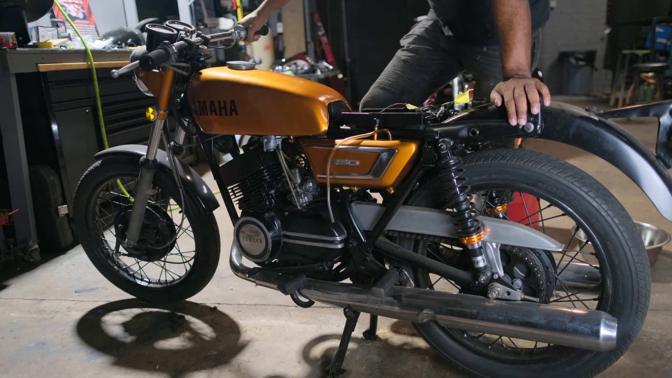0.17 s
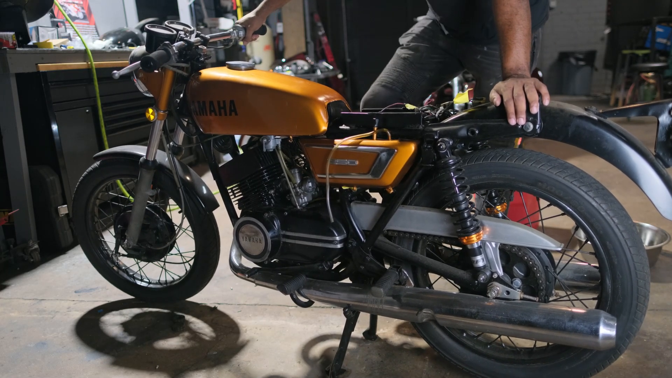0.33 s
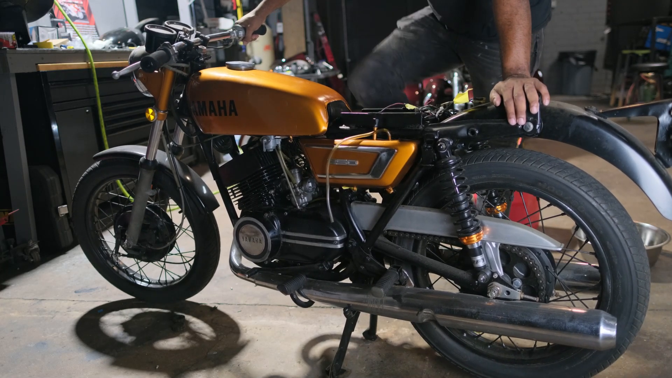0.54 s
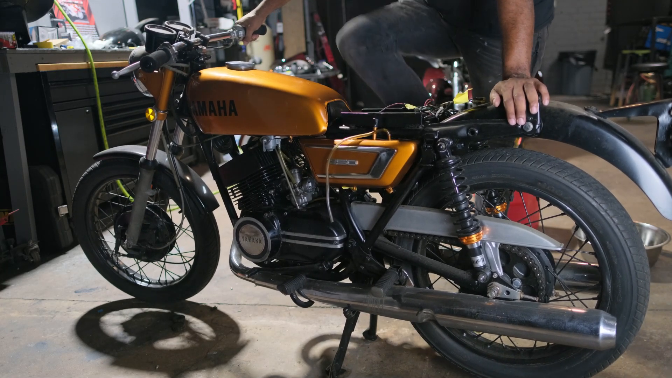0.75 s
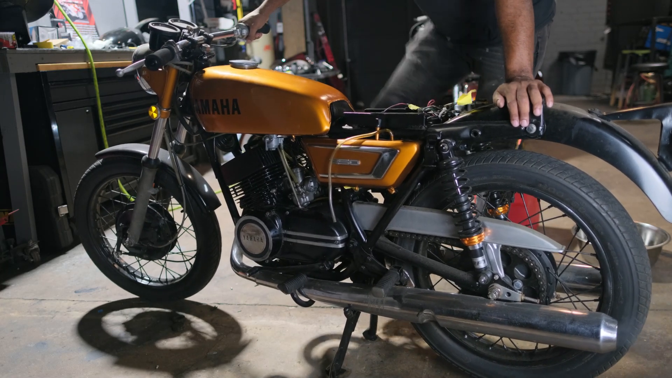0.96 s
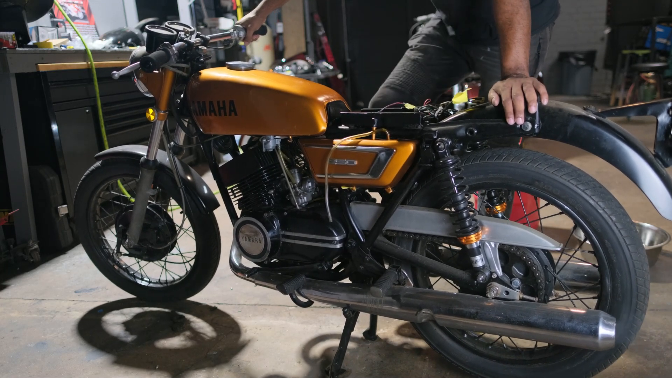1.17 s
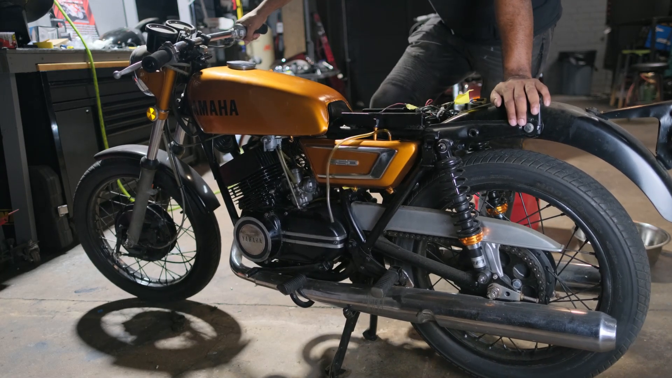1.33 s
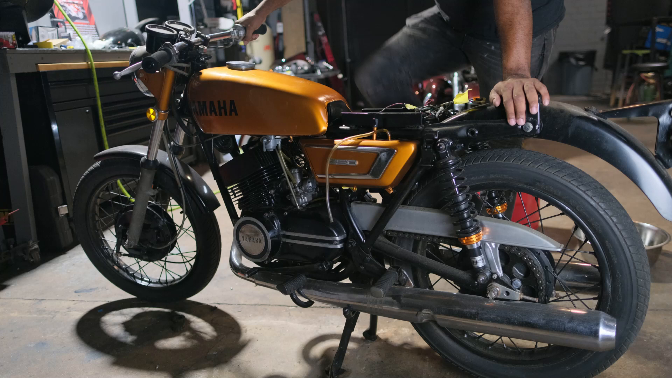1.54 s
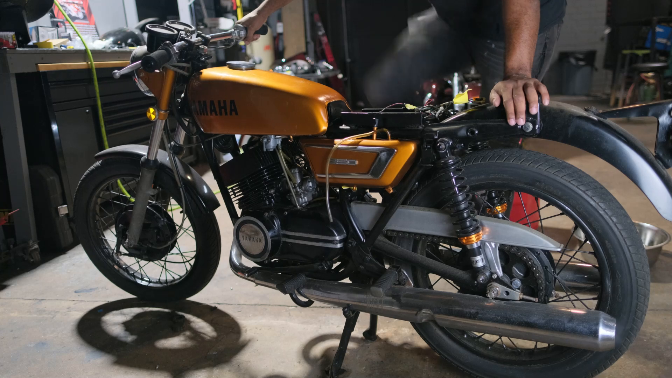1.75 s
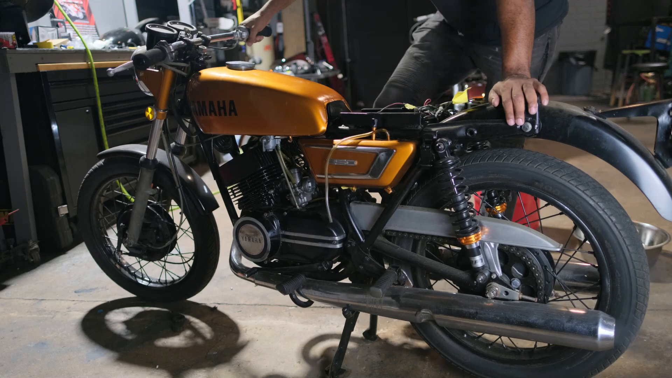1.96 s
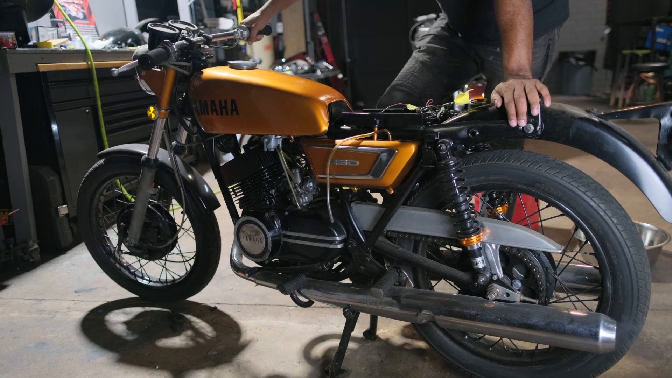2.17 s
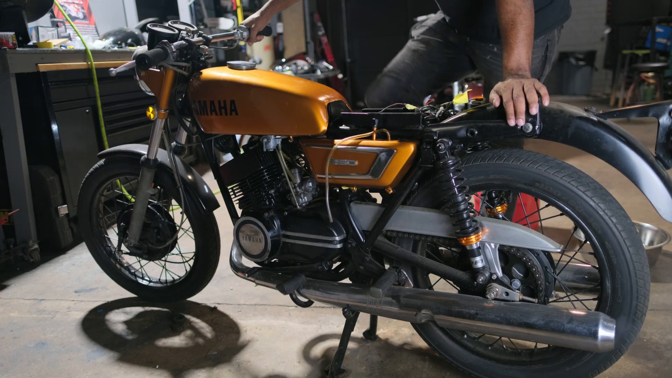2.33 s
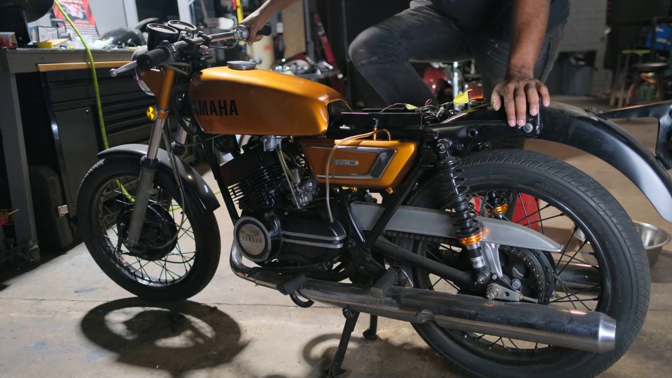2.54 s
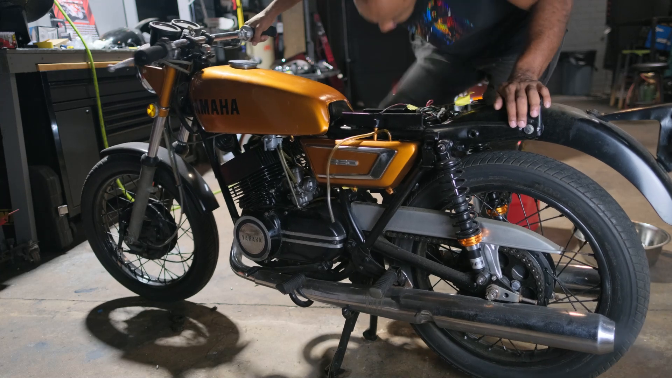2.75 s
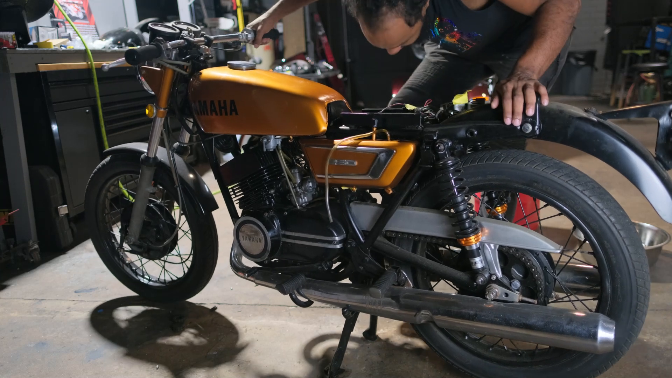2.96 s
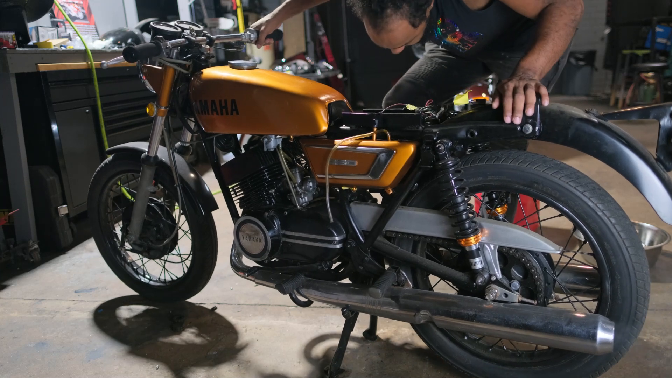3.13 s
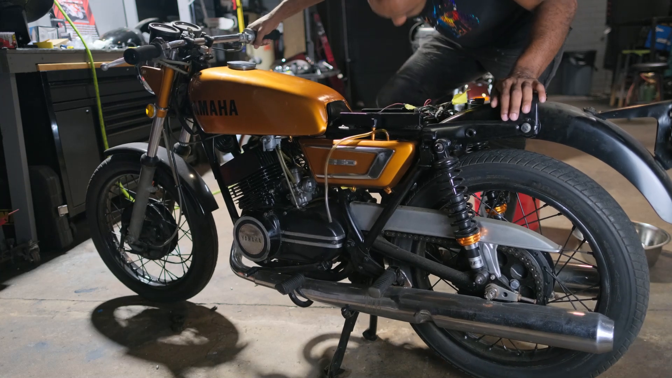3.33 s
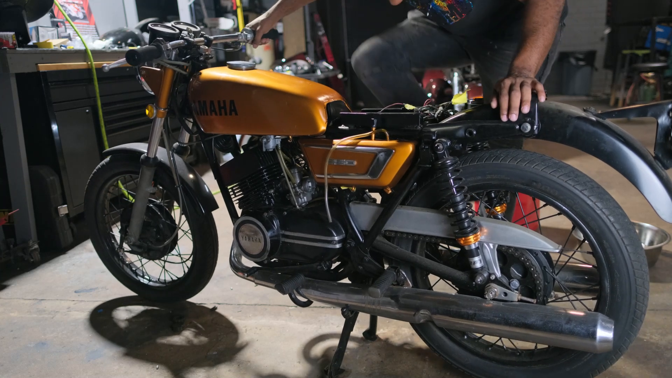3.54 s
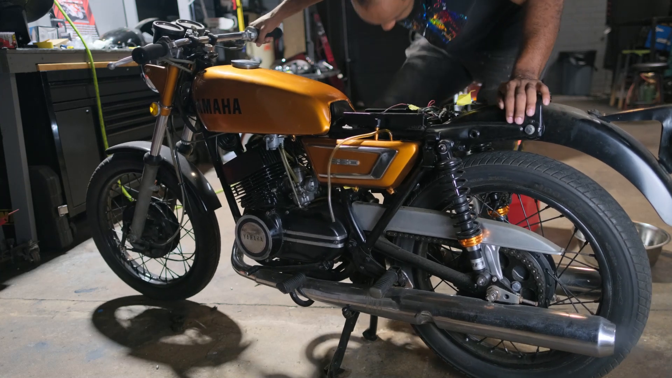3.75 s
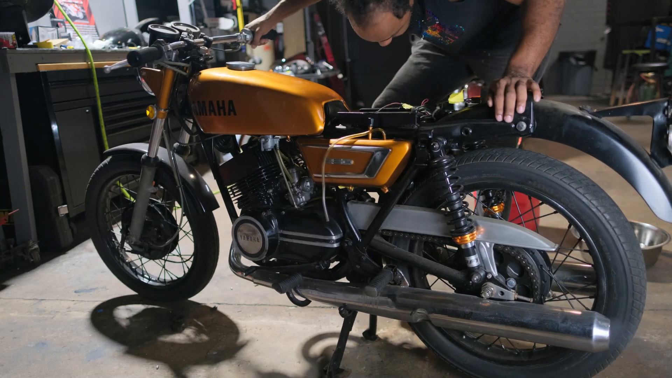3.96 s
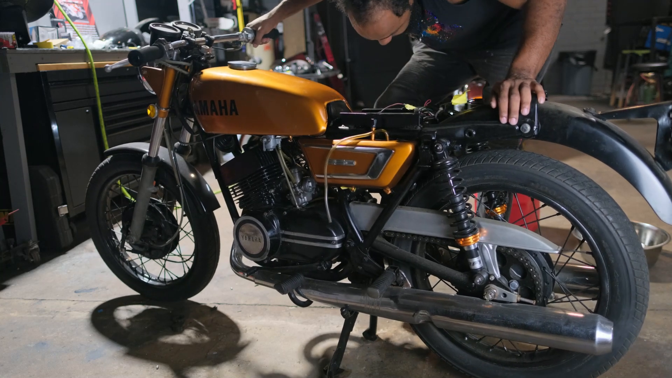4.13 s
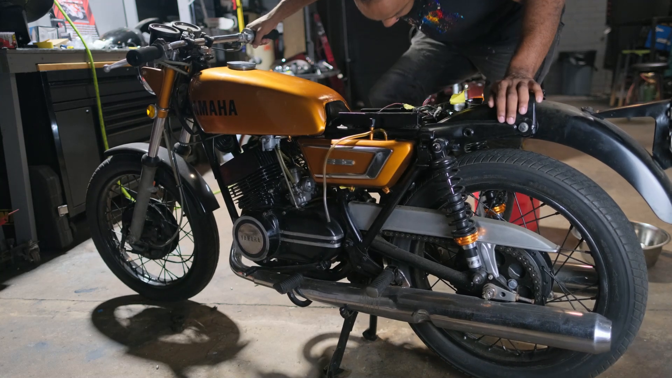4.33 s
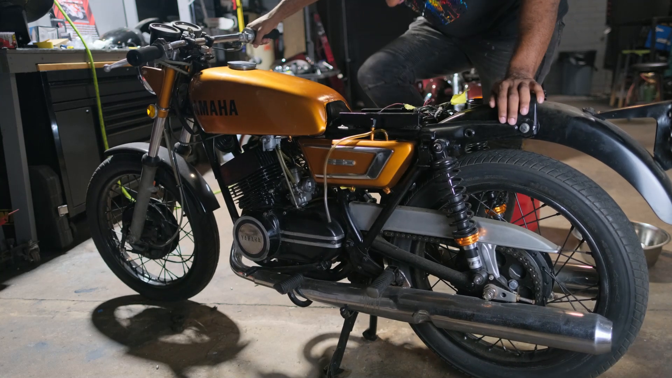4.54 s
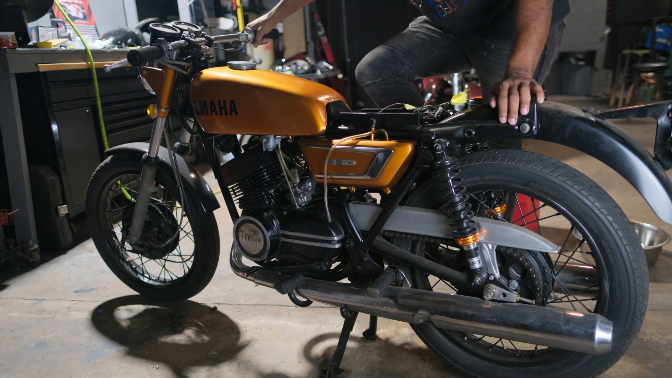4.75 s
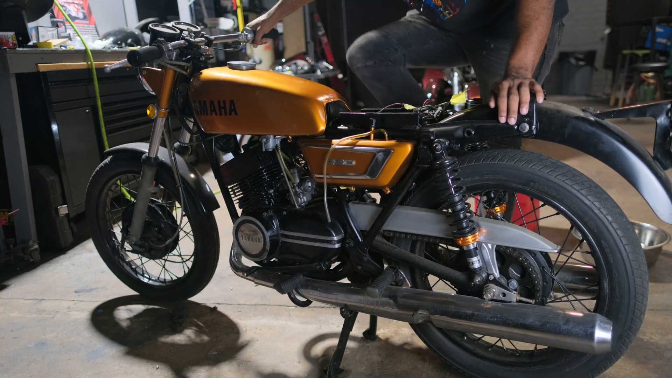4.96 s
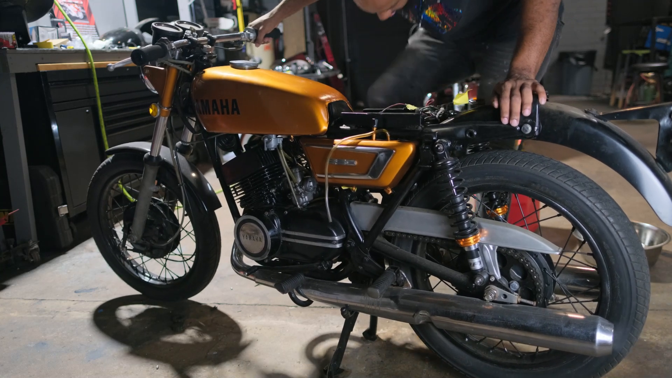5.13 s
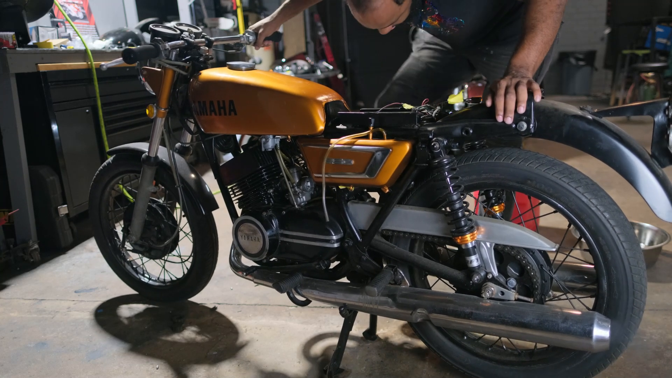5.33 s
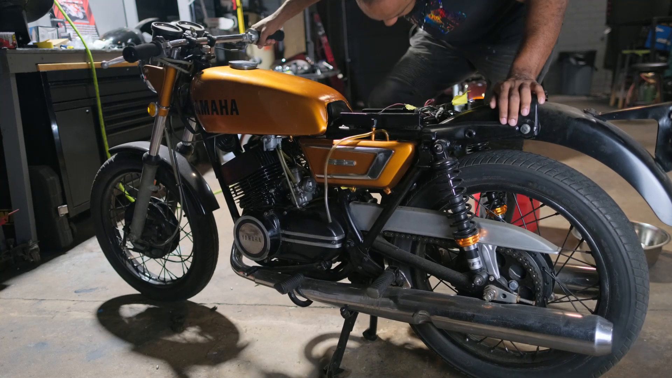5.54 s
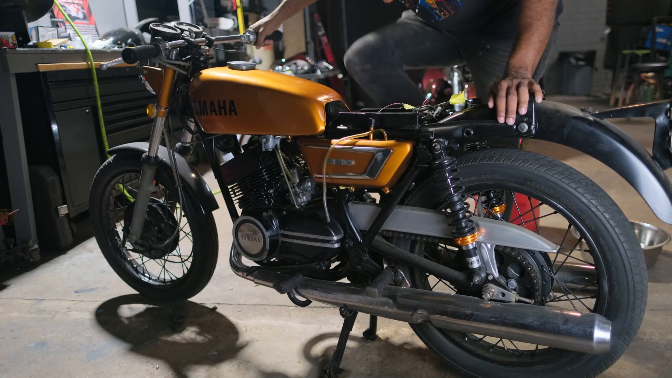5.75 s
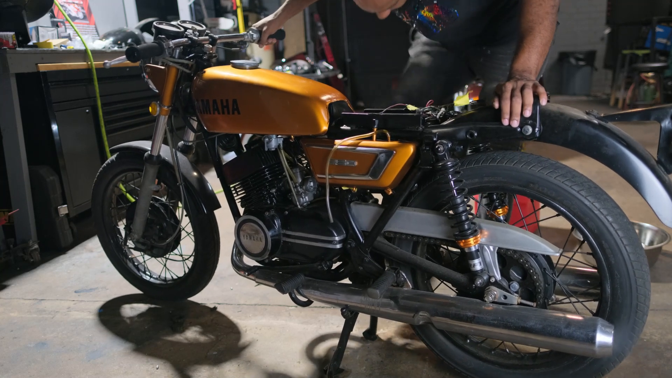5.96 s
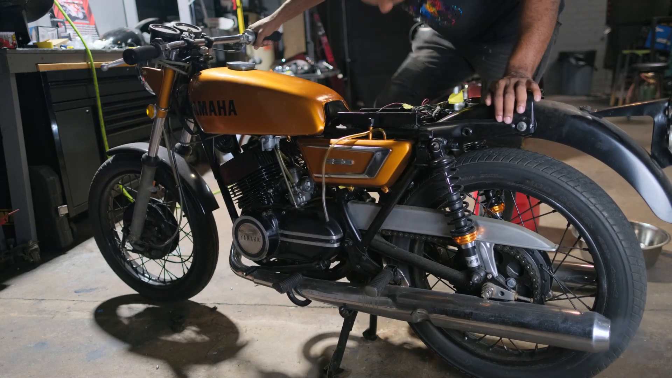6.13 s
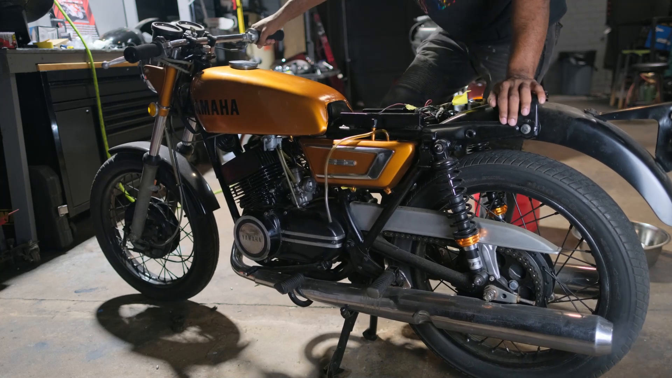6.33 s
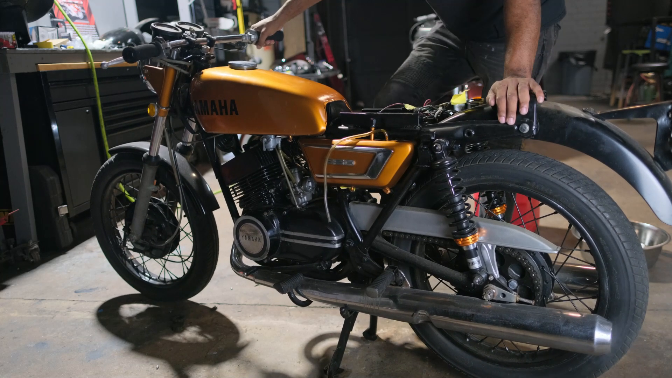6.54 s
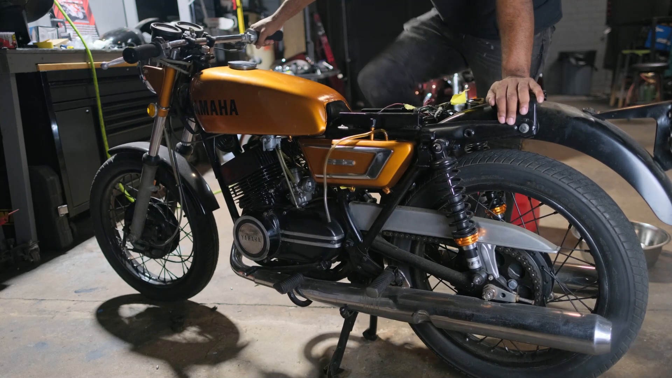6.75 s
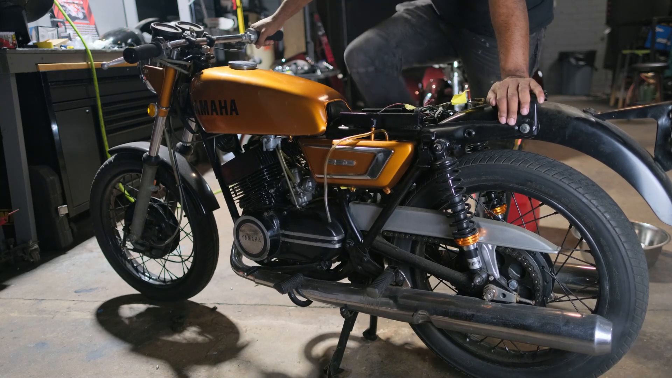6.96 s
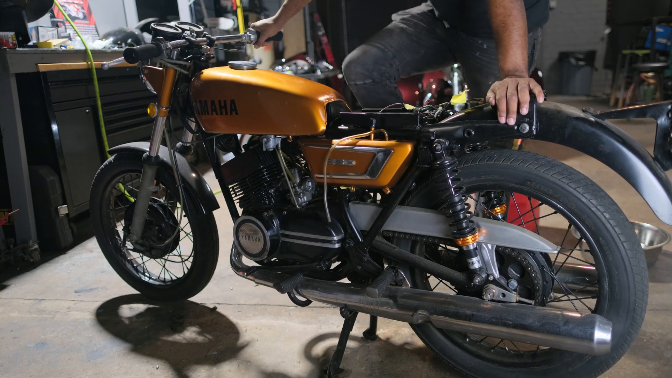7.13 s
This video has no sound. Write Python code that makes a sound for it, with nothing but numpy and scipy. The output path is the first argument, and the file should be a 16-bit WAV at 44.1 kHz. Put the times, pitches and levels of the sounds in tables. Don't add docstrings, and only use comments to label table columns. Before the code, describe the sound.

Repeated failed kick-starts: hard metallic clanks, short gear whirr with airy exhaust chuffs dying away, then a slipped lever slaps loudly and the room rings.

```python
import sys
import numpy as np
from scipy import signal
from scipy.fft import rfft, irfft
from scipy.io import wavfile
from scipy.ndimage import uniform_filter1d

SR = 44100
rng = np.random.default_rng(int(sys.argv[2]) if len(sys.argv) > 2 else 0)


def rack_gain(trim_db):
    fader = np.asarray(trim_db, float)
    return 10 ** (fader / 20)


def unload_audio(sound):
    columns = np.transpose(np.atleast_2d(sound))
    steps = np.round(np.clip(columns, -1, 1) * 32767)
    wavfile.write(sys.argv[1], SR, steps.astype(np.int16))


N = 317107

# [f/Hz, width/Hz, level/dB]
CASE_MODES = [(1574, 300, 0), (2140, 460, -0.5), (2913, 360, 1.5), (3295, 144, 1.5), (3610, 660, -3)]
# [f/Hz, width/Hz, level/dB]
PIPE_MODES = [(85.3, 18.2, 2), (102.3, 19.2, -5.5), (132.4, 21.9, -3.5), (168.8, 50, -21),
              (198.5, 20.3, -11.5), (231.5, 19, -30)]
# [f/Hz, density/dB per Hz]
PORT_HISS = [(2530, -53), (4300, -21), (5980, -1.5), (6460, -5.5), (6790, 4), (7790, 2), (8500, -4),
             (11600, -7), (12600, -15), (15100, -12), (16000, -31)]


def evened(x):
    return x / np.sqrt(np.mean(x ** 2) + 1e-20)


def peaked(x):
    return x / abs(x).max()


def read(points, hz):
    f, value = np.transpose(points)
    return np.interp(np.log(hz + 1), np.log(f + 1), value)


def add(mix, start_s, sound):
    part = mix[round(max(start_s, 0) * SR):][:len(sound)]
    part += sound[:len(part)]


def coloured(points):
    spectrum = rfft(rng.standard_normal(N))
    return evened(irfft(spectrum * rack_gain(read(points, np.fft.rfftfreq(N, 1 / SR))), N))


def body(x, modes):
    out = np.zeros(len(x))
    for k, (hz, width_hz, db) in enumerate(modes):
        r = np.exp(-np.pi * 1.62 * width_hz / SR)
        pole = r * np.exp(2j * np.pi * hz / SR)
        ring = x
        for _ in range(2):
            ring = 2 * signal.lfilter([1 - r], [1, -pole], ring).real
        out += (-1) ** k * rack_gain(db) * ring
    return out


def crank():
    # [start t/s, rise/s, driven/s, gears level/dB, pipes level/dB]
    kicks = [
        (-0.06, 0.12, 0.08, -23, -15),
        (0.815, 0.1, 0.23, -23, -16.5),
        (1.762, 0.12, 0.25, -27.5, -20),
        (2.625, 0.065, 0.31, -23, -16.5),
        (3.683, 0.085, 0.24, -26, -18),
        (5.09, 0.095, 0.22, -23, -16),
        (5.879, 0.105, 0.13, -25.5, -17),
    ]
    start_db, sag_db_per_s, coast_db_per_s = (-8, -10), (20, 24), (105, 115)
    power = np.zeros((3, N))
    for start_s, rise_s, driven_s, *tops_db in kicks:
        t = np.arange(N) / SR - start_s
        rising = np.clip(1 - t / rise_s, 0, 1)
        held_s = np.clip(t - rise_s, 0, driven_s)
        coasting_s = np.clip(t - rise_s - driven_s, 0, None)
        gears_db, pipes_db = (top + start * rising - sag * held_s - coast * coasting_s for top, start, sag, coast
                              in zip(tops_db, start_db, sag_db_per_s, coast_db_per_s))
        bright_db = np.minimum(-8 + 25 * t, 1)
        breathing_db = tops_db[1] - 11.5 - 27 * t
        kick = rack_gain(2 * np.array([gears_db, gears_db + bright_db, pipes_db]))
        kick[2] += rack_gain(2 * breathing_db)
        power += kick * np.clip(t / 0.008, 0, 1)
    return np.sqrt(power)


def ports(pipes):
    # [t/s, air level/dB]
    spits = [(0.1146, -25.5), (0.202, -22), (0.2788, -30), (1.03, -23.5), (1.073, -24), (1.153, -26),
             (1.226, -32), (1.3225, -37), (1.8254, -31), (1.8713, -33), (1.9273, -22.5), (2.0643, -23),
             (2.15, -33), (2.805, -26), (2.9, -29), (2.981, -24), (3.8434, -31), (3.9834, -20),
             (4.0676, -29), (4.1594, -38), (5.1523, -24.5), (5.3018, -26), (5.454, -18), (5.5413, -35),
             (5.641, -37), (5.909, -25.5), (5.9406, -27), (6.0186, -31), (6.127, -22), (6.289, -31)]
    # [t/s, air level/dB]
    puffs = [(0.0, -23.5), (0.04, -33), (0.0732, -24), (0.3216, -31), (0.38, -41), (0.8455, -28),
             (0.8864, -28), (0.9204, -35), (0.9547, -24.5), (0.9894, -31), (1.27, -32.5), (1.9962, -23),
             (2.109, -32), (2.241, -37), (2.294, -38), (2.6494, -24.5), (2.6807, -30), (2.7236, -26),
             (2.8596, -25), (3.104, -34), (3.7534, -27), (3.9072, -25), (5.1954, -27), (5.219, -31),
             (5.269, -25.5), (6.0777, -27), (6.1705, -30), (6.334, -32)]
    # [t/s, air level/dB]
    chuffs = [(0.1414, -33), (0.235, -31), (0.443, -44), (1.1094, -32), (1.18, -28), (1.3805, -37),
              (1.793, -36), (2.0265, -38), (2.1765, -30), (2.9357, -31), (3.04, -38), (3.708, -33),
              (3.8142, -26), (3.942, -44), (4.0194, -38), (4.102, -31), (4.21, -42), (5.117, -28),
              (5.3635, -28.5), (5.385, -29), (5.4913, -36), (5.5777, -32), (5.704, -45), (5.9903, -29),
              (6.234, -29.5), (6.3994, -47)]
    # (rows, case sound/dB re air, thump/dB re pipes, length/s)
    kinds = [(spits, -4, 1.5, 0.015), (puffs, 3.5, 3, 0.023), (chuffs, 9.5, 1.5, 0.022)]
    hiss, case, steps = np.zeros((3, N))
    t = np.arange(6000) / SR
    for rows, case_db, thump_db, length_s in kinds:
        burst = (1 - np.exp(-t / 0.0035)) * np.exp(-t / (1.15 * length_s))
        for start_s, air_db in rows:
            add(hiss, start_s, rack_gain(air_db - 10.5) * burst)
            add(case, start_s, rack_gain(air_db + case_db - 6.5) * burst)
            add(steps, start_s, rack_gain(thump_db - 4.5) * np.hanning(160))
    shove = (45, 30, -11)
    thump = rack_gain(16.5) * body(steps * pipes, PIPE_MODES + [shove])
    case_noise = evened(body(rng.standard_normal(N), CASE_MODES))
    return hiss * coloured(PORT_HISS) + case * case_noise + thump


def whirr(gears, rattle, pipes):
    # [f/Hz, width/Hz, level/dB]
    gear_modes = [(189.5, 105, 0.5), (433, 132, -1), (626, 111, 0), (770, 85, -0.5), (1100, 420, -5.5)]
    hits = rng.random(N) < 900 / SR
    hit_gain = rack_gain(3.14 * np.minimum(rng.exponential(1, N), 4))
    teeth = rng.standard_normal(N) * (0.18 + hit_gain * hits)
    drone = evened(body(rng.standard_normal(N), PIPE_MODES))
    drone = drone / (0.18 + uniform_filter1d(drone ** 2, size=1600)) ** 0.36
    low = rack_gain(-3) * gears * evened(body(teeth, gear_modes))
    high = rack_gain(-12) * rattle * evened(body(teeth, CASE_MODES))
    leak = rack_gain(-28) * gears * coloured(PORT_HISS)
    return low + high + rack_gain(-3.5) * pipes * evened(drone) + leak


def background():
    # [f/Hz, density/dB per Hz]
    air = [(15, 2), (45, 2), (108, 7), (170, -4), (236, -10), (354, -12), (463, -13), (734, -18.5),
           (936, -19), (2000, -26), (3340, -33.5), (5280, -35), (16000, -43)]
    # [t/s, level/dB]
    hum_levels = [(0.0, -58), (0.64, -60), (1.3, -58), (1.6, -56), (2.0, -60), (2.45, -63), (3.1, -56),
                  (3.5, -57), (4.0, -62), (4.48, -65), (4.8, -59), (5.19, -57), (5.75, -62), (7.19, -64.5)]
    s, db = np.transpose(hum_levels)
    waver = evened(uniform_filter1d(rng.standard_normal(N), size=9000))
    hum_hz = 237.8 + 2.6 * waver
    hum = np.sqrt(2) * np.sin(2 * np.pi * np.cumsum(hum_hz) / SR)
    return rack_gain(-50) * coloured(air) + rack_gain(np.interp(np.arange(N) / SR, s, db)) * hum


def garage(x):
    # [f/Hz, t60/s]
    decay = [(60, 1.01), (150, 1.16), (500, 1.286), (1500, 1.057), (4000, 1.07), (8000, 0.68),
             (16000, 0.55)]
    taps = np.zeros(2 * SR)
    at = np.arange(300, 2 * SR - 20, 20)
    taps[at + rng.integers(0, 20, len(at))] = rng.choice([-1., 1.], len(at))
    hz, t, z = signal.stft(taps, SR, nperseg=512)
    fade = rack_gain(-60 * t / read(decay, hz)[:, None])
    tail = signal.istft(z * fade, SR, nperseg=512)[1]
    return signal.fftconvolve(x, tail / np.linalg.norm(tail))[:N]


def chatter(length_s, grit):
    t = np.arange(4000) / SR / length_s
    shape = t * np.exp(-(t / 0.87) ** 2) + 0.14 * np.minimum(t, 1) * np.exp(-t / 1.3)
    z = rfft(rng.standard_normal(len(t)) * shape)
    flat = z / np.sqrt(uniform_filter1d(abs(z) ** 2, size=9))
    contact = irfft(flat, len(t)) * np.sqrt(shape)
    impact = np.exp(-((t - 0.5) / 0.0066) ** 2)
    return grit * 1.6 * peaked(contact) + 1.1 * impact


def blow(db, hz, case_db, tick_db, length_s):
    force = chatter(length_s, 1.0)
    ring = body(force, [(hz, 200, 0), (0.5 * hz, 250, -7), (1.25 * hz, 260, -8)])
    case = body(force, CASE_MODES)
    tick = body(force, [(4300, 600, 4), (6200, 1700, 1), (10500, 3000, -3), (14500, 2000, -7)])
    frame = body(force, [(170, 135, 2), (332, 62, -6)])
    struck = peaked(ring) + rack_gain(case_db) * peaked(case)
    return rack_gain(db) * (struck + rack_gain(tick_db) * peaked(tick) + rack_gain(-14) * peaked(frame))


def lever():
    # [t/s, level/dB, main ring f/Hz, case level/dB re blow,
    # tick level/dB re blow]
    ticks = [(0.77, -40, 684, -7, -32), (0.787, -33, 654, -1, -31), (0.792, -33, 1050, -12, -21),
             (1.694, -31.5, 620, -14, -27.5), (1.714, -39, 600, 1, -18), (1.727, -37, 1120, 0, 1),
             (2.448, -38, 770, -17.5, -19), (2.576, -40, 687, 0, -15), (2.592, -42, 1480, 2, -3),
             (3.624, -40, 624, 5, -19), (3.644, -43, 1350, 7, -4), (4.382, -43, 620, -3, -6),
             (5.014, -56, 600, 8, -3), (5.046, -44, 600, 5.5, -21), (5.066, -35, 1450, 4, -9),
             (5.827, -38, 711, 3, -19), (5.863, -22, 3800, -4, -14), (6.67, -46, 1180, -8, -15),
             (6.826, -33, 750, -17, -18), (6.838, -32, 822, -7, -4), (6.652, -56, 1380, -10, -3),
             (5.844, -36, 1400, 3, -14)]
    # [t/s, level/dB, main ring f/Hz, brightness/dB, chatter length/s]
    clanks = [(0.81, -6, 1160, -1, 0.0067), (1.748, -11, 1075, 3, 0.0086), (1.759, -7, 1146, 4, 0.0065),
              (1.906, -15, 1100, 6, 0.013), (2.609, -19, 3500, 3, 0.009), (2.62, -9.5, 1100, 0, 0.0091),
              (2.754, -12, 1035, 9, 0.006), (2.998, -9.5, 1050, -6, 0.009), (3.663, -20, 3700, 3, 0.0081),
              (3.677, -7, 1150, -1, 0.007), (5.087, -8, 1100, 3, 0.0067), (5.875, -6.5, 1100, 3, 0.0065)]
    out = np.zeros(N)
    for start_s, *row in ticks:
        add(out, start_s, blow(*row, length_s=0.008))
    for start_s, db, hz, bright_db, length_s in clanks:
        add(out, start_s, blow(db, hz, -8.5 + bright_db, -19.5 + 1.4 * bright_db, length_s))
    return out


def resonate(x, hz, width_hz):
    turn = np.exp(2j * np.pi * np.cumsum(hz) / SR)
    r = np.exp(-np.pi * width_hz / SR)
    return 2 * (turn * signal.lfilter([1 - r], [1, -r], x / turn + 1e-18)).real


def squeaks():
    # [t/s, f/Hz, level/dB]
    glides = [
        [(3.565, 3600, -53), (3.575, 3460, -60), (3.6, 3060, -59)],
        [(4.612, 4060, -60), (4.622, 3930, -61), (4.65, 2940, -63), (4.67, 2780, -66)],
        [(4.89, 1900, -65), (4.905, 3000, -64), (4.93, 3460, -75), (4.97, 3950, -63)],
        [(6.6, 1360, -62), (6.66, 1320, -57), (6.72, 1370, -66)],
    ]
    out = np.zeros(N)
    for rows in glides:
        s, hz, db = np.transpose(rows)
        t = np.arange(s[0], s[-1], 1 / SR)
        hz = np.interp(t, s, hz)
        noise = rng.standard_normal(len(t))
        whistle = resonate(resonate(noise, hz, 800), hz, 800)
        octave = resonate(resonate(noise, 2 * hz, 400), 2 * hz, 400)
        tone = evened(whistle) + 0.23 * evened(octave)
        add(out, s[0], rack_gain(np.interp(t, s, db)) * tone * np.hanning(len(t)) ** 0.3)
    return out


def slip():
    # [t/s, peak level/dB, length/s, garage level/dB re slap]
    slap_row = (6.9, 1, 0.009, -6)
    # [f/Hz, width/Hz, level/dB]
    stop_modes = [(150, 90, -16), (378, 134, -15), (690, 260, -11), (1120, 200, -2.5), (1700, 240, 3),
                  (2300, 480, -9), (3680, 420, -9), (5740, 700, -25), (9000, 3000, -36)]
    start_s, db, length_s, garage_db = slap_row
    slap, sent = np.zeros((2, N))
    force = chatter(length_s, 0.3)
    impulse = signal.unit_impulse(len(force))
    add(slap, start_s, rack_gain(db) * peaked(body(force, stop_modes)))
    add(sent, start_s, rack_gain(db + garage_db) * peaked(body(impulse, stop_modes)))
    return slap, sent


def scene():
    gears, rattle, pipes = crank()
    machine = ports(pipes) + whirr(gears, rattle, pipes) + lever() + squeaks()
    slap, slap_sent = slip()
    return (machine + slap + garage(rack_gain(-9.5) * machine + slap_sent) + background())[None]


def top_cut(x):
    return signal.sosfilt(signal.butter(12, 16370, fs=SR, output="sos"), x)


def record(dry):
    cut = signal.sosfilt(signal.butter(2, 65, "high", fs=SR, output="sos"), dry)
    mix = 1.387 * np.tanh(cut / 1.051)
    return top_cut(mix)


dry = scene()
out = record(dry)
unload_audio(out)
```